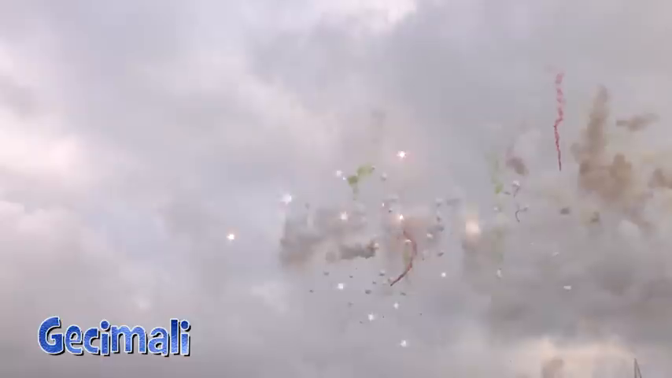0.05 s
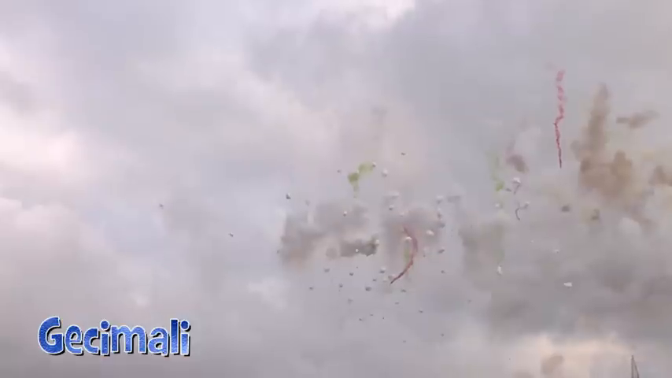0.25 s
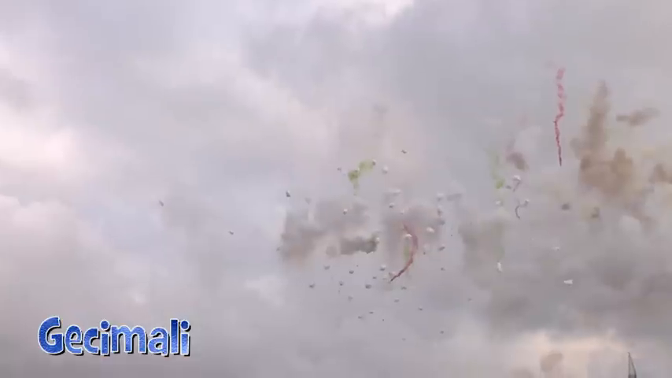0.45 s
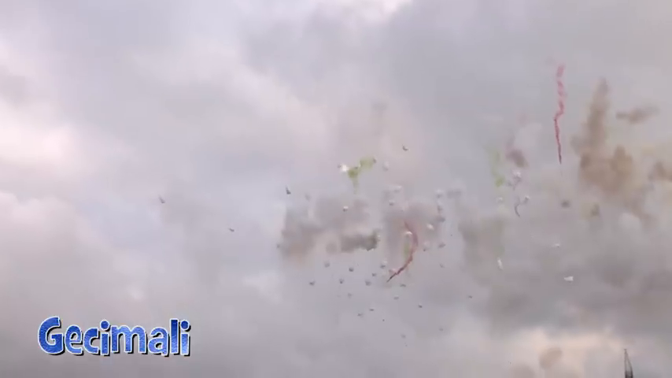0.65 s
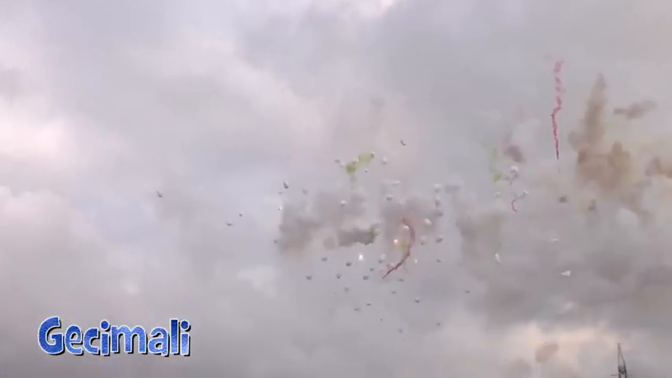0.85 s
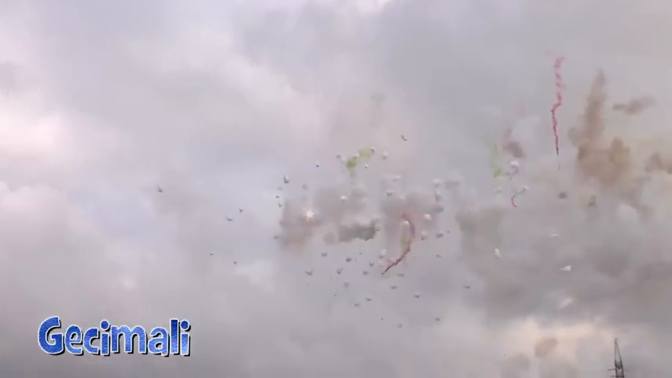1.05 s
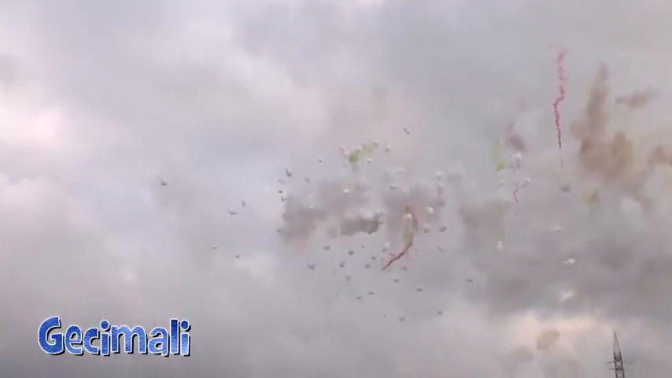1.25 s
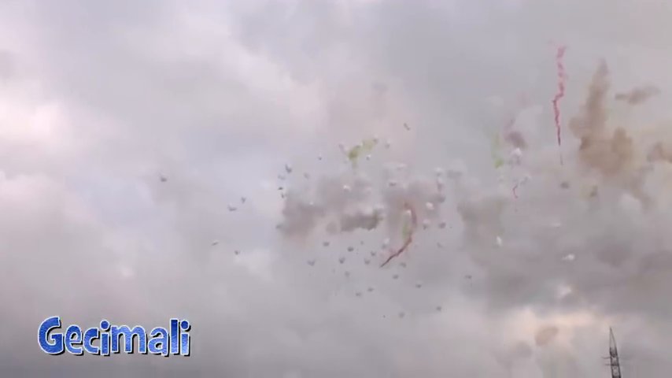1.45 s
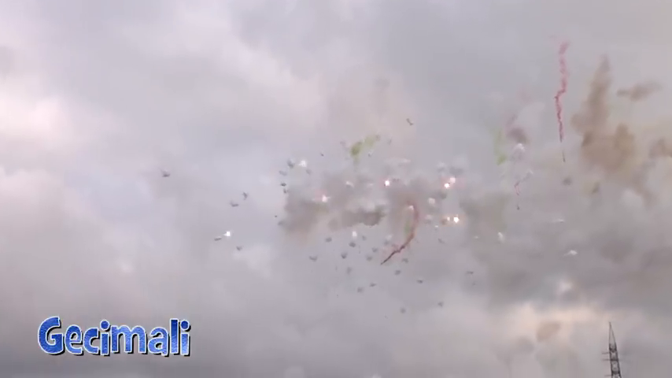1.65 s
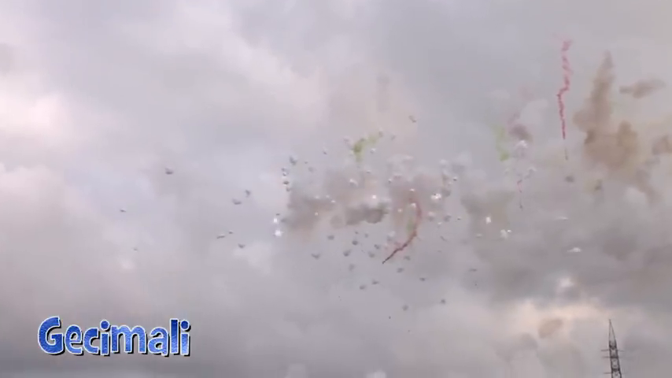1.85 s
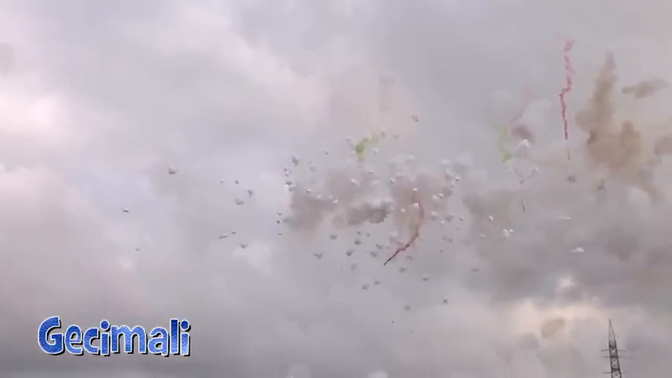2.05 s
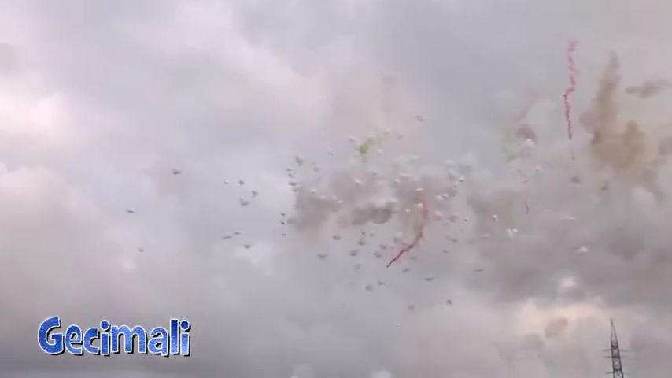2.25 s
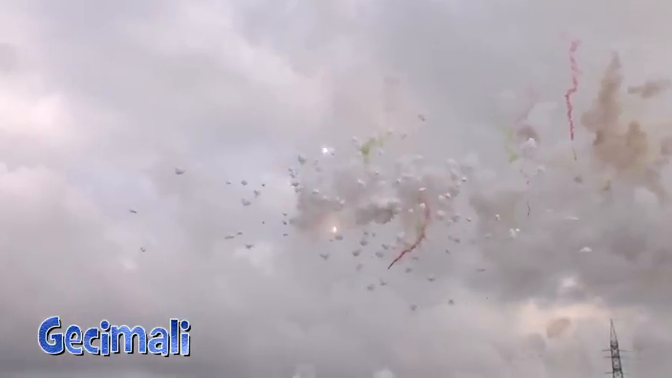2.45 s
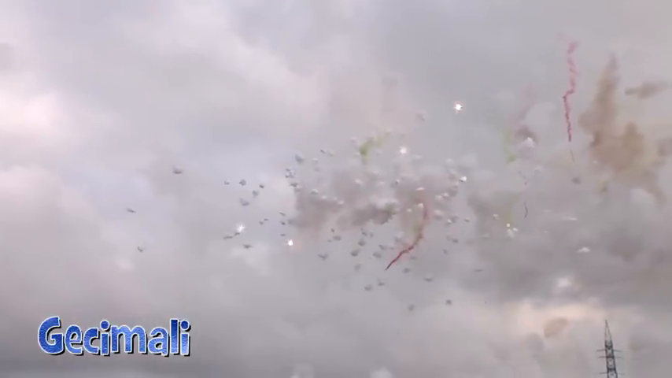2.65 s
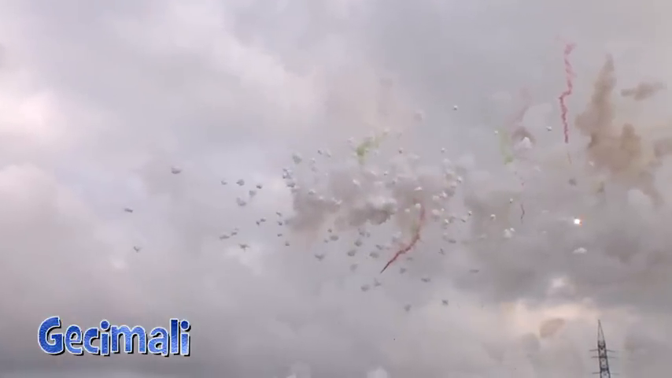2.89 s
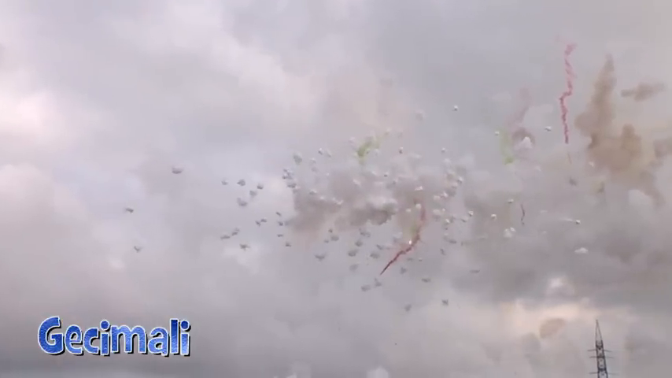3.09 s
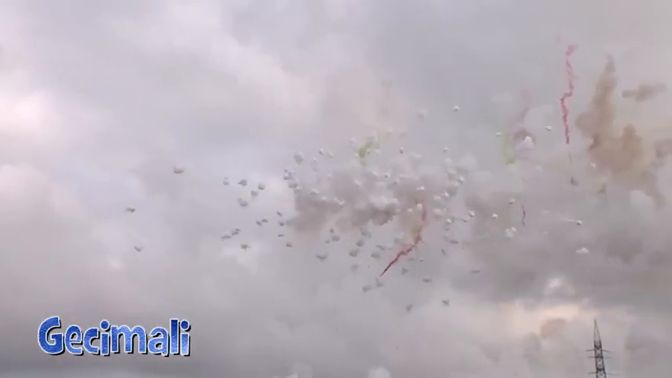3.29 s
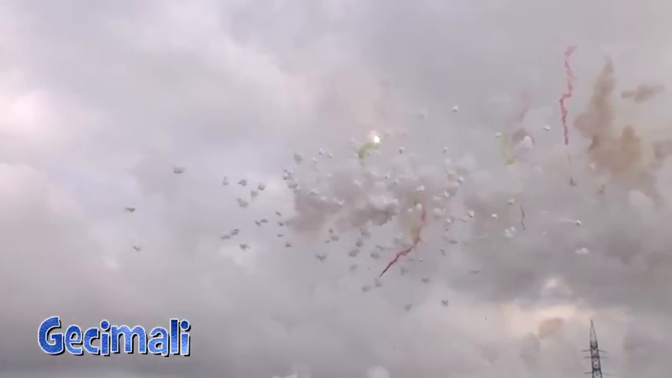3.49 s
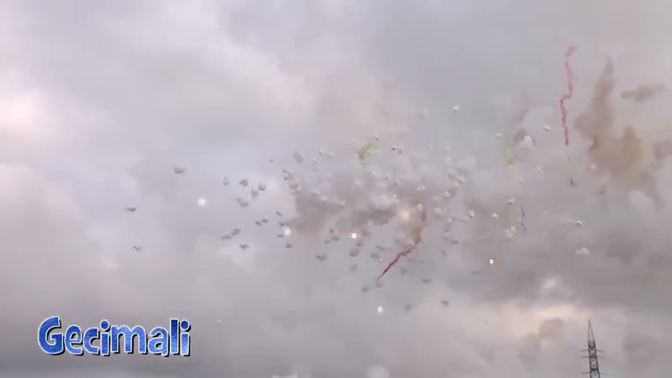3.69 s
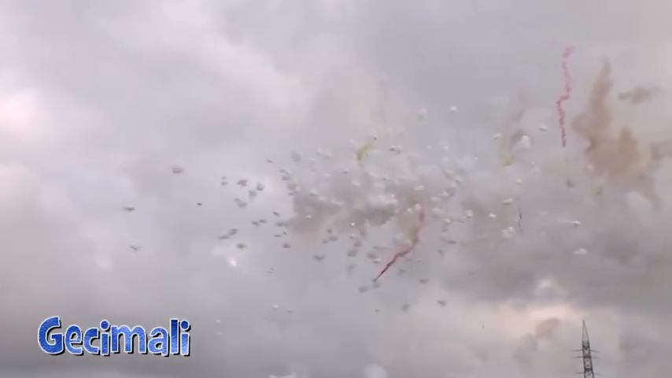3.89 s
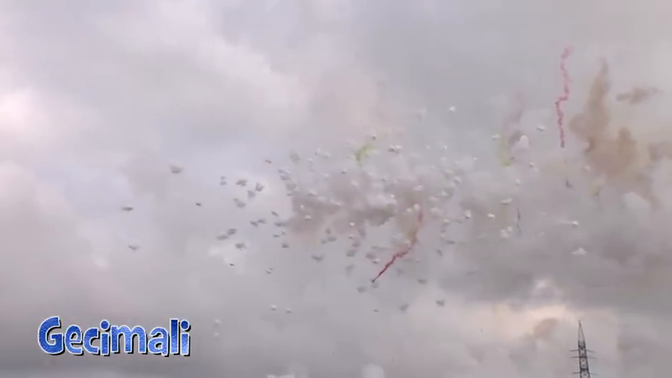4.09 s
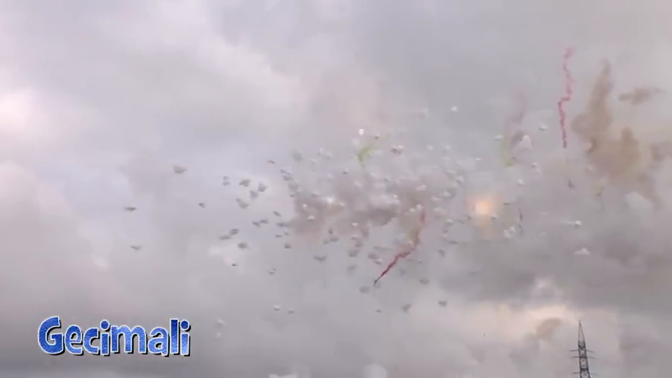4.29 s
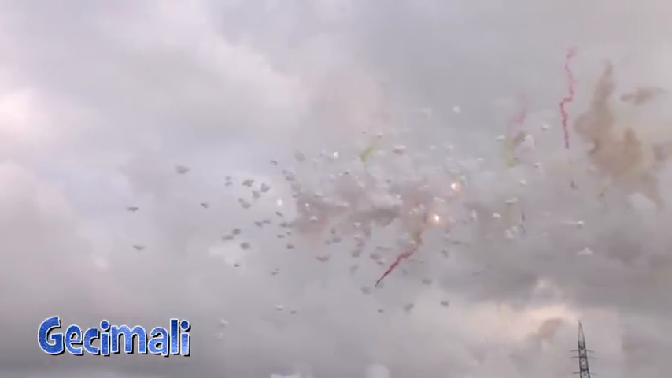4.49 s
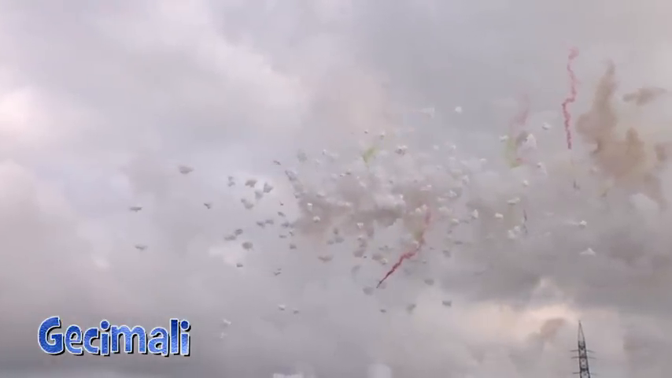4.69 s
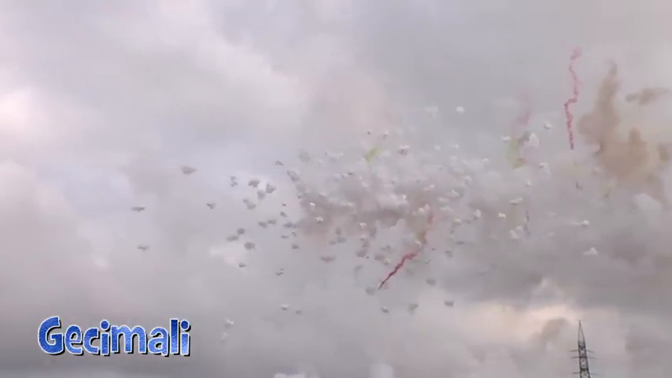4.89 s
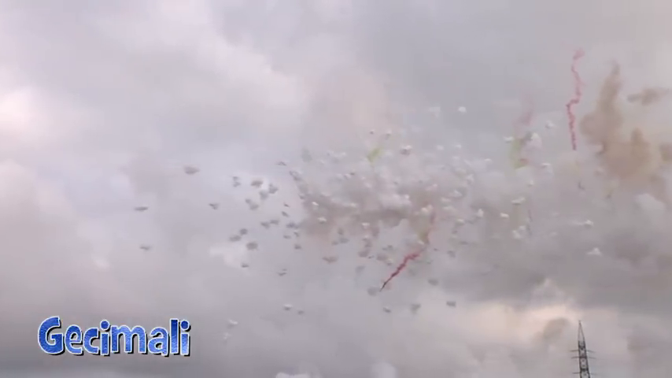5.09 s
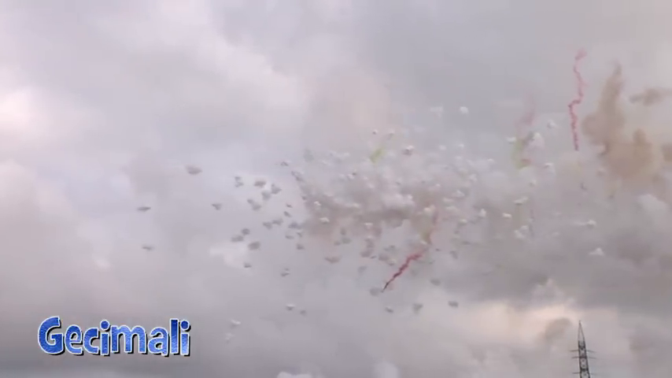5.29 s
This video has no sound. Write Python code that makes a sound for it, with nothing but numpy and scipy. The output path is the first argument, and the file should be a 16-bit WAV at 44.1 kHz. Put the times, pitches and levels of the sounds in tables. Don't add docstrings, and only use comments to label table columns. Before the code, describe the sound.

A fading rumble from an earlier volley opens, then six quick clusters of aerial firework bangs follow, each about half a second long. Hard cracks with thick low booms and near slaps overload a camera microphone, louder and brighter on the left. Thunderous echoes from distant hills roll through the gaps and the ending.

```python
import sys
import numpy as np
from scipy import signal
from scipy.fft import rfft, irfft
from scipy.io import wavfile
from scipy.ndimage import uniform_filter1d

SR = 44100
rng = np.random.default_rng(int(sys.argv[2]) if len(sys.argv) > 2 else 0)


def unload_audio(sound):
    columns = np.transpose(np.atleast_2d(sound))
    steps = np.round(np.clip(columns, -1, 1) * 32767)
    wavfile.write(sys.argv[1], SR, steps.astype(np.int16))


def volts_from_db(level):
    exponent = np.asarray(level, float) / 20
    return 10 ** exponent


N = 235663


def one_pole(x, tau_s, rate):
    keep = np.exp(-1 / (tau_s * rate))
    return signal.lfilter([1 - keep], [1, -keep], x)


# first burst in seconds, last burst in seconds, echo strength in dB.
SALVOS = [
    (-.75, -.25, -.4),
    (.14, .58, -1.5),
    (.85, 1.33, -1.2),
    (1.84, 2.28, -.8),
    (2.66, 3.32, -1.5),
    (3.71, 4.17, 1.5),
    (4.55, 4.97, -1.8),
]


def far_power(rise_s, t60):
    rate = 1000
    t = np.arange(-2, N / SR + .01, 1 / rate)
    fed = np.zeros(len(t))
    for first_s, last_s, strength_db in SALVOS:
        bursting = np.clip((t - first_s) * rate, 0, 1) * np.clip((last_s - t) * rate, 0, 1)
        fed += volts_from_db(2 * strength_db) * bursting
    built = one_pole(fed, max(rise_s, .01), rate)
    power = one_pole(built, t60 / np.log(1e6), rate)
    return np.interp(np.arange(N) / SR - rise_s, t, power)


def flutter(rate):
    hold = int(SR / rate)
    steps = rng.standard_normal(200)[np.arange(N) // hold % 200]
    slewed = uniform_filter1d(uniform_filter1d(steps, hold), hold)
    return slewed / slewed.std()


def along_hz(points, size):
    hz, value = np.transpose(points)
    return np.interp(np.log(np.fft.rfftfreq(size, 1 / SR) + 1), np.log(hz), value)


# frequency in Hz, correlation from 0 to 1.
LIKENESS = [(60, 0.2), (150, 0.85), (600, 0.75), (1500, 0.21), (3000, 0.27), (8000, 0.15)]
# frequency in Hz, level in dB.
RIGHT_DB = [(60, -24), (200, -6.5), (700, -14), (2400, -19.5), (8000, -16.5), (15000, -29.5)]


def stereo(shared, own):
    like = np.clip(along_hz(LIKENESS, N), 0, 1)
    mixed = like * rfft(shared) + np.sqrt(1 - like ** 2) * rfft(own)
    right = mixed * volts_from_db(along_hz(RIGHT_DB, N))
    return np.array([shared, irfft(right, N)])


# frequency in Hz, density in dB per Hz.
ROLL_COLOUR = [(20, -40), (45, -25), (80, -11), (114, -7), (156, -1), (205, -5.5), (255, -19.5),
               (330, -14.5), (446, -22), (640, -24.5), (1190, -31.5), (3070, -39), (5550, -45.5),
               (14000, -71.5)]
SPLITS_HZ = (85, 700, 3500)
# level in dB, lag and build-up in seconds, t60 in seconds,
# flutter depth in dB, flutters per second.
FAR_BANDS = [
    (-19, .11, 4.5, 2.1, 9.1),
    (-9.8, .03, 3.6, 1.6, 14.1),
    (-23.4, .27, 3.9, .8, 7.1),
    (-32.2, .04, 2.6, .8, 11.1),
]


def roll():
    spectrum = rfft(rng.standard_normal((2, N))) * volts_from_db(along_hz(ROLL_COLOUR, N))
    bins_hz = np.fft.rfftfreq(N, 1 / SR)
    lowpasses = [1 / (1 + (bins_hz / hz) ** 4) for hz in SPLITS_HZ]
    below = [0] + lowpasses + [1]
    total = 0
    for (level_db, rise_s, t60, flutter_db, rate), under, over in zip(FAR_BANDS, below, below[1:]):
        band = irfft(spectrum * (over - under), N)
        envelope = np.sqrt(far_power(rise_s, t60))
        wavering = volts_from_db(level_db + flutter_db * flutter(rate))
        total = total + band / band.std() * envelope * wavering
    return stereo(*total)


# frequency in Hz, t60 in seconds, level in dB.
BOUNCE = [(57, 0.019, -30), (158.8, 0.032, 1), (205, .03, -4), (325.8, 0.039, -5), (284.4, .04, -13),
          (496.3, 0.047, -18), (607, 0.01, -54)]


def blast_shapes():
    t = np.arange(SR // 6) / SR
    front = (1 - t / .0015) * np.exp(-t / 0.0017)
    snap = (1 - t / 0.000049) * np.exp(-t / 0.000087)
    boom = np.zeros(len(t))
    for hz, t60, db in BOUNCE:
        boom += volts_from_db(db) * np.cos(2 * np.pi * hz * t + 1.588) * 1000 ** (-t / t60)
    return front, snap, boom


# start in seconds, blast level in dB, near-echo t60 in seconds, sharpness in dB.
VOLLEY_1 = [(.142, 16.5, .077, -1), (.176, 12, .11, -.5), (.2249, -2, .13, -5), (.2499, 5.5, .28, -.5),
            (.2742, 5.5, .17, 0), (.2979, 11.5, .22, 0), (.3519, 24.5, .1, -5.5), (.3689, 5.5, .1, -.5),
            (.4035, 18, .083, -8.5), (.4182, 13, .091, -3.5), (.4428, 7.5, .2, -5),
            (.4707, 13.5, .053, -2.5), (.5113, 1.5, .12, -.5), (.5516, 9.5, .12, -3), (.617, -7.5, .076, 4),
            (.6893, -10.5, .14, -11)]
VOLLEY_2 = [(.854, 7.5, .081, 2.5), (.9008, -2, .17, 0), (.9178, 6, .095, -8.5), (.9713, 12.5, .098, -2.5),
            (1.0175, 12.5, .14, -3.5), (1.052, 7.5, .12, 3), (1.1023, 7.5, .3, -4.5), (1.2111, 17, .07, 0),
            (1.256, 17.5, .097, -4), (1.2776, 1, .25, 1.5), (1.305, 3, .1, 0), (1.367, -6, .05, 5)]
VOLLEY_3 = [(1.8357, 15, .042, 9.5), (1.8603, 11, .07, -3.5), (1.8767, 8.5, .13, -4),
            (1.9138, 8.5, .14, -.5), (1.9369, 11, .12, -3), (1.9933, 6.5, .26, -2.5), (2.0511, 9, .3, -.5),
            (2.0662, 22, .26, -6), (2.157, 4, .13, -7.5), (2.17, 12, .11, -3.5), (2.2415, 5, .13, -5),
            (2.2612, 8, .085, 0), (2.3183, -9, .096, 3.5)]
VOLLEY_4 = [(2.6617, 17.5, .09, -2), (2.6846, 15.5, .066, 1.5), (2.7333, 4, .11, 1.5),
            (2.7852, 8, .085, -.5), (2.8335, 10.5, .088, -4), (2.8508, 4.5, .081, 2.5),
            (2.8698, 8, .061, .5), (2.9087, 7, .09, -1), (2.9313, 15.5, .076, 0), (2.9722, 3, .14, 0),
            (2.9942, 8, .28, -3.5), (3.0635, 10.5, .11, -1), (3.1112, 4, .15, 1), (3.1269, 9, .096, 0),
            (3.1751, 5.5, .22, -1.5), (3.271, 8.5, .069, -.5), (3.3148, 6, .09, 1), (3.368, -9.5, .14, -5),
            (3.4405, -5.5, .13, -17)]
VOLLEY_5 = [(3.715, 12, .076, -2), (3.7611, -1.5, .25, -4), (3.7796, 13.5, .14, -2), (3.8369, 2.5, .15, .5),
            (3.8582, 9.5, .14, -5), (3.8863, 7, .3, .5), (3.926, 6, .051, 2.5), (3.9445, 9, .18, -5),
            (3.9751, 3.5, .11, 2.5), (3.9925, 12.5, .085, -7), (4.0263, 10.5, .096, .5),
            (4.0491, 18, .065, -6), (4.0684, 7, .17, -1.5), (4.0862, -1.5, .12, 3.5), (4.11, 7, .12, -2.5),
            (4.1486, 3.5, .12, -1.5), (4.1933, -3.5, .23, -4), (4.241, -10, .11, -6),
            (4.2952, -6.5, .12, -18)]
VOLLEY_6 = [(4.5466, 9.5, .055, 4.5), (4.5724, 8, .1, -5.5), (4.6197, -2.5, .13, 5.5),
            (4.6583, 3.5, .15, -7), (4.7201, 11.5, .17, -2), (4.748, 6, .086, -3), (4.7768, 5, .2, -2),
            (4.815, 6, .22, -3.5), (4.8643, 6.5, .085, 1), (4.9098, -2.5, .18, -5), (4.9484, 9.5, .18, -3),
            (5.0105, -9, .18, 1.5), (5.1044, -7, .11, -10)]


def shells():
    size = SR // 2
    t = np.arange(size) / SR
    bursts = VOLLEY_1 + VOLLEY_2 + VOLLEY_3 + VOLLEY_4 + VOLLEY_5 + VOLLEY_6
    chance = rng.standard_normal((len(bursts), 3, size), dtype=np.float32)
    dull, sharp, thin = np.zeros((3, 2, N + size))
    swell = 1 - np.exp(-t / 0.00089)
    far_walls = volts_from_db(-25.5) * 1000 ** (-t / 0.59)
    for (s, blast_db, t60, sharp_db), (shared, own, spiky) in zip(bursts, chance):
        reflectors = volts_from_db(-22.5 + 4.0 * spiky)
        fade = reflectors * swell * (1000 ** (-t / max(t60, .01)) + far_walls)
        fade[0] = 1
        shared[0] = own[0] = 1
        shade_db = min(0, 0.83 * (blast_db + 1.5))
        fade = fade * volts_from_db([[0], [shade_db]])
        i = int((s + .0008) * SR)
        blast = volts_from_db(blast_db) * fade
        edge = volts_from_db(blast_db + sharp_db) * fade
        dull[:, i:i + size] += blast * [shared, 0.96 * shared + 0.34 * own]
        sharp[:, i:i + size] += edge * [shared, 0.79 * shared + 0.86 * own]
        thin[:, i:i + size] += edge * [shared, own]
    front, snap, boom = blast_shapes()
    boom_heard = volts_from_db([[0], [-8.0]]) * signal.fftconvolve(dull, boom[None])
    front_heard = volts_from_db([[3.0], [-7.0]]) * signal.fftconvolve(sharp, front[None])
    snap_heard = volts_from_db([[-3.0], [-12.0]]) * signal.fftconvolve(thin, snap[None])
    left, right = (boom_heard + front_heard + snap_heard)[:, :N]
    return np.array([np.roll(left, shift=1), right])


def scene():
    return roll() + shells()


AFTER_LULL_S = [.55, 1.21, 2.26, 3.27, 4.72, 4.945]


def gain_control():
    open_db, pull_db, lull_db = -.2, 6.9, 2.2
    hold_s, attack_s, release_s = .1, .055, .2
    t = np.arange(N) / SR
    pull = np.zeros(N)
    for first_s, last_s, _ in SALVOS:
        sink = 1 - np.exp(-np.clip(t - first_s - hold_s, 0, None) / attack_s)
        recover = np.exp(-np.clip(t - last_s, 0, None) / release_s)
        pull += sink * recover
    ease = np.zeros(N)
    for s in AFTER_LULL_S:
        ease += np.exp(-np.abs(t - s) / np.where(t < s, .015, attack_s))
    return volts_from_db(open_db - pull_db * pull + lull_db * ease)


def one_way(x, order, hz, kind):
    return signal.sosfilt(signal.butter(order, hz, kind, fs=SR, output="sos"), x)


def roll_off(x):
    return signal.sosfilt(signal.butter(12, 16410, fs=SR, output="sos"), x)


# left ceiling in dB, right ceiling in dB.
CEILING_DB = (.3, -3.3)


def record(dry):
    ceiling = volts_from_db(np.array(CEILING_DB))[:, None]
    ported = one_way(dry, 2, 74, "high")
    hardness = 5.0
    squared = ported / (1 + np.abs(ported / ceiling) ** hardness) ** (1 / hardness)
    treble = one_way(ported, 1, 1500, "high")
    fizz = volts_from_db(-13.5) * ceiling * np.tanh(treble / ceiling)
    coupled = one_way(squared + fizz, 1, 16, "high")
    dulled = one_way(coupled, 1, 7000, "low")
    levelled = dulled * gain_control()
    topped = one_way(levelled, 14, 15400, "low")
    return roll_off(np.clip(topped, -1, 1))


dry = scene()
out = record(dry)
unload_audio(out)
```